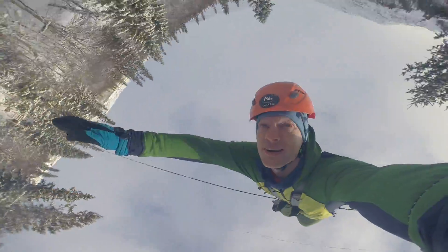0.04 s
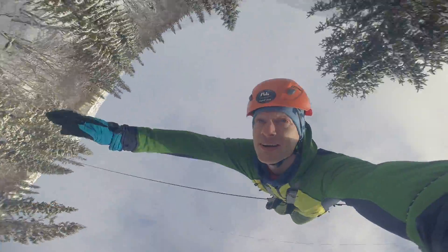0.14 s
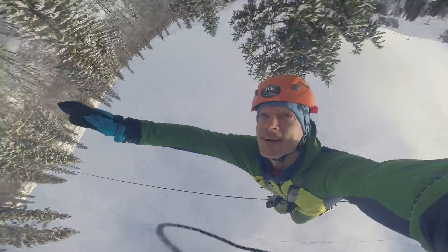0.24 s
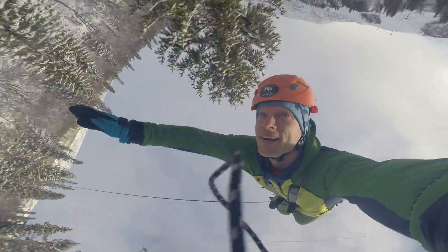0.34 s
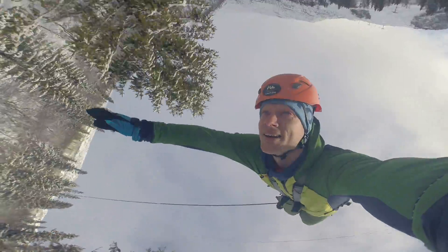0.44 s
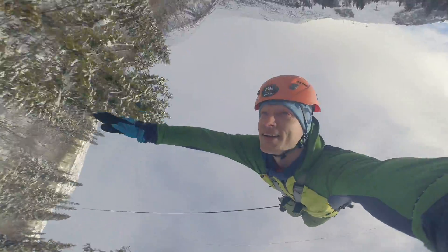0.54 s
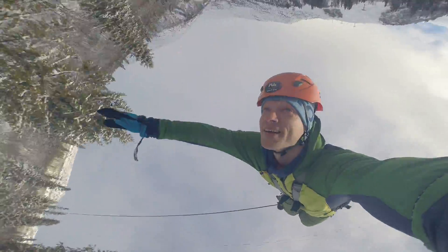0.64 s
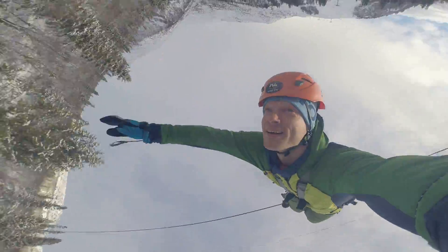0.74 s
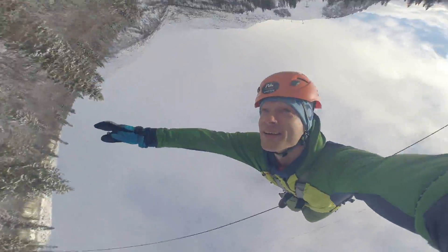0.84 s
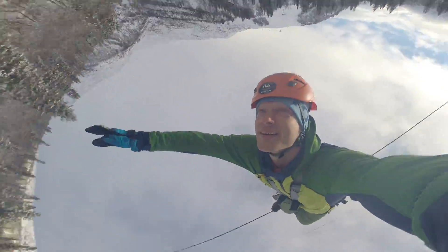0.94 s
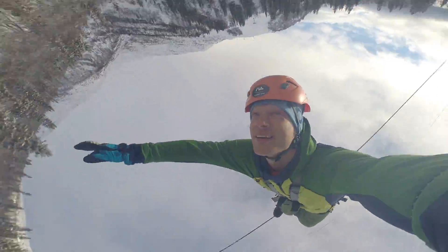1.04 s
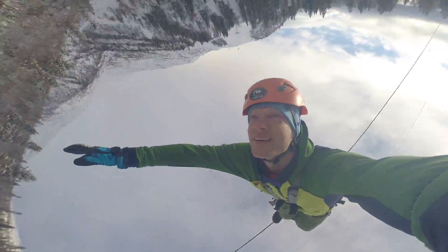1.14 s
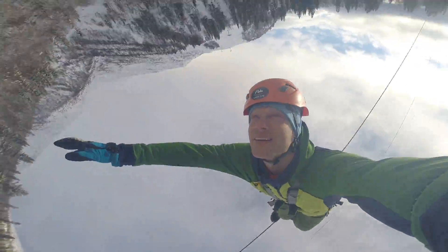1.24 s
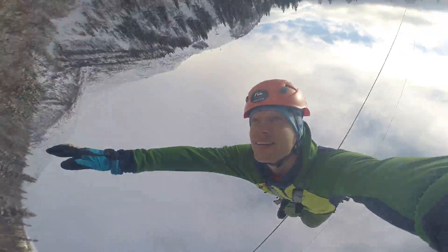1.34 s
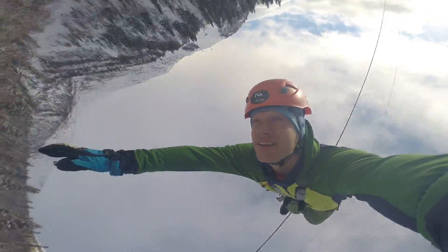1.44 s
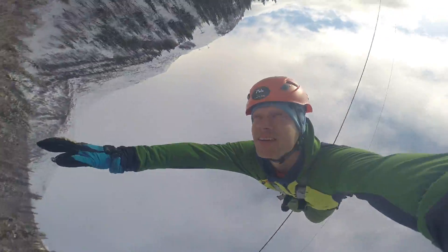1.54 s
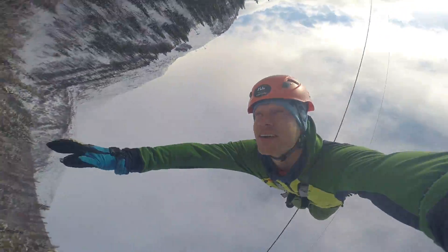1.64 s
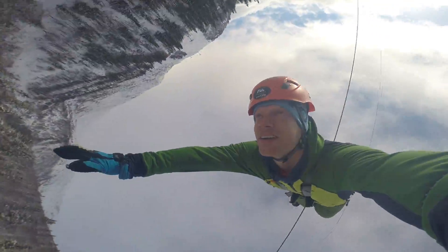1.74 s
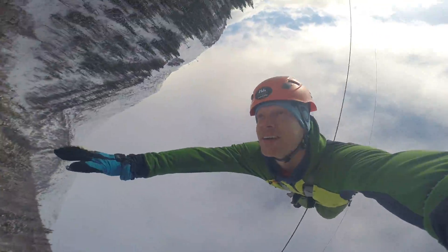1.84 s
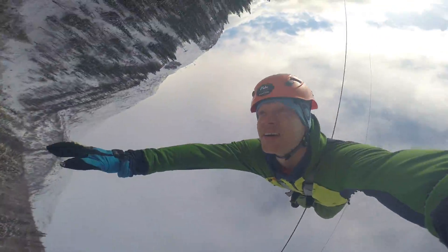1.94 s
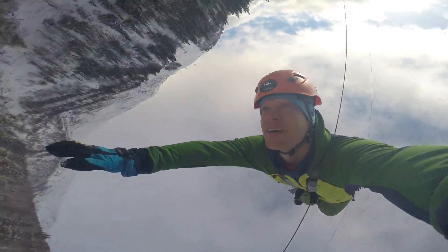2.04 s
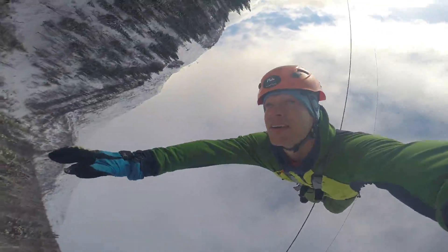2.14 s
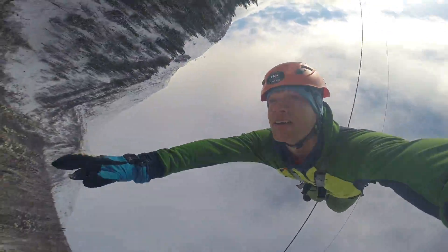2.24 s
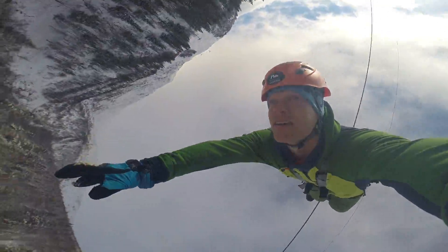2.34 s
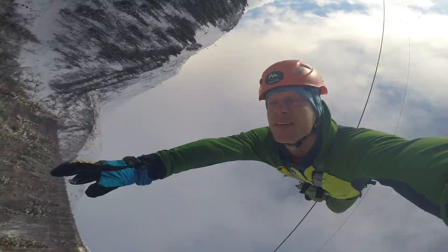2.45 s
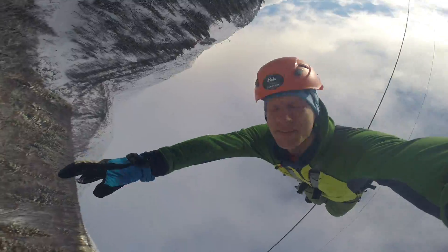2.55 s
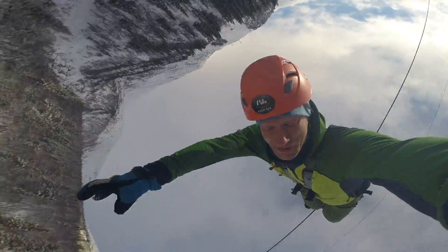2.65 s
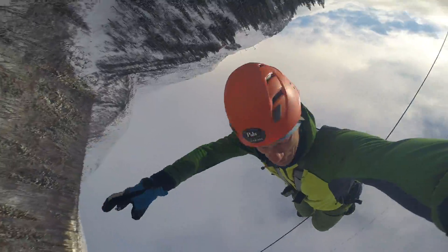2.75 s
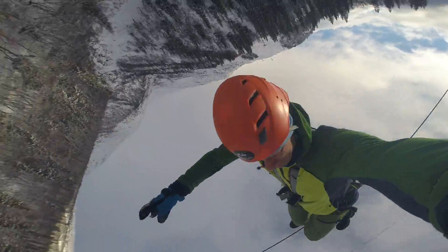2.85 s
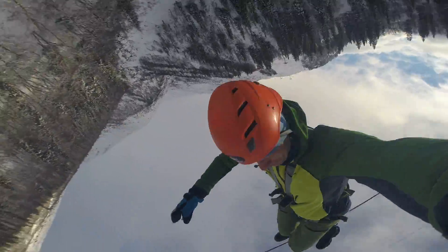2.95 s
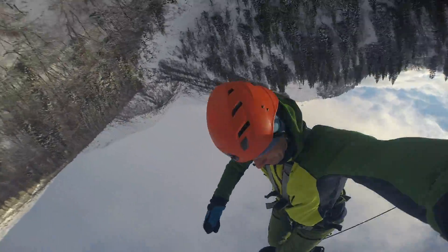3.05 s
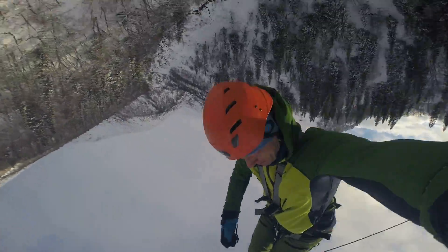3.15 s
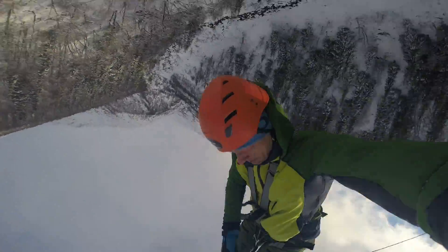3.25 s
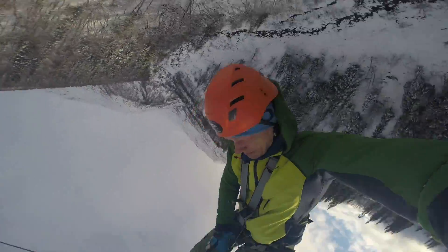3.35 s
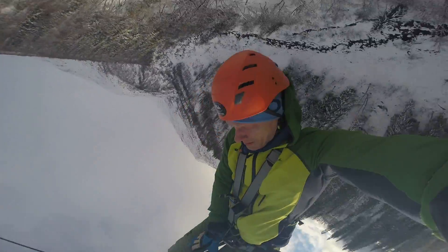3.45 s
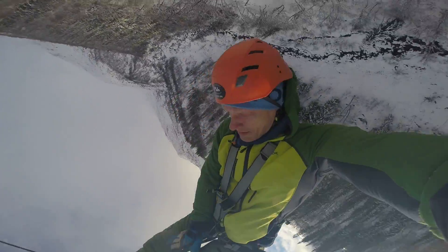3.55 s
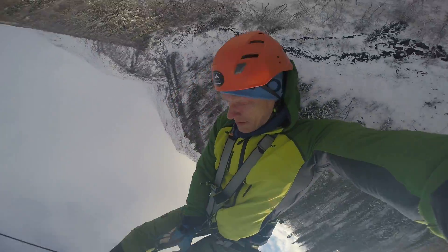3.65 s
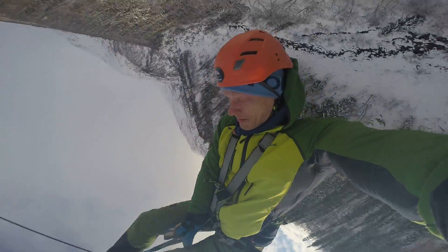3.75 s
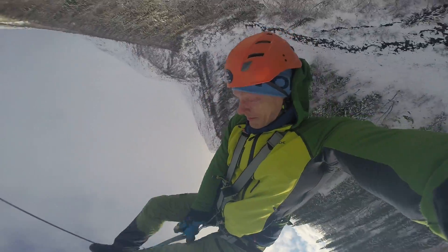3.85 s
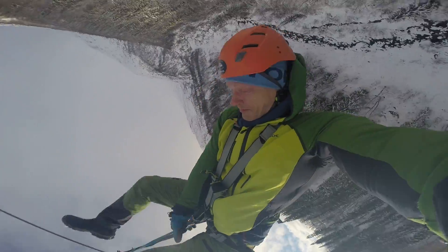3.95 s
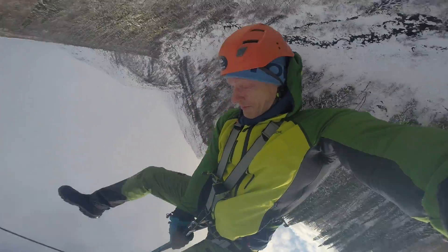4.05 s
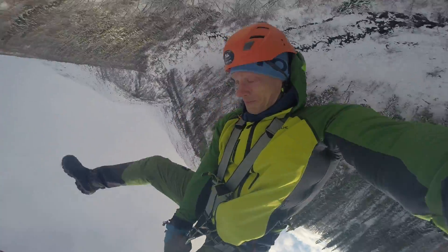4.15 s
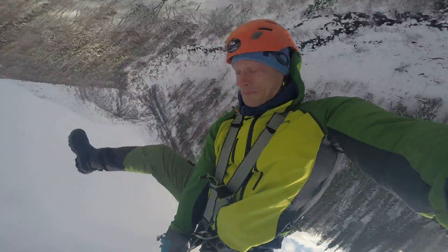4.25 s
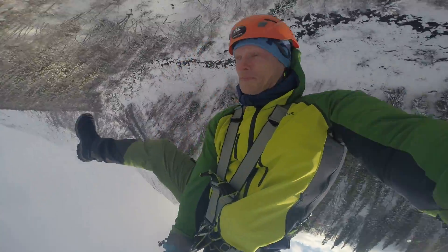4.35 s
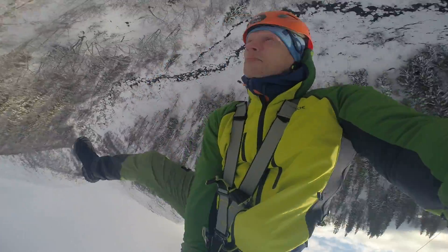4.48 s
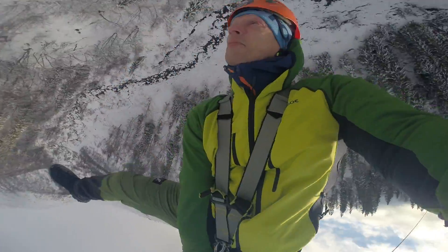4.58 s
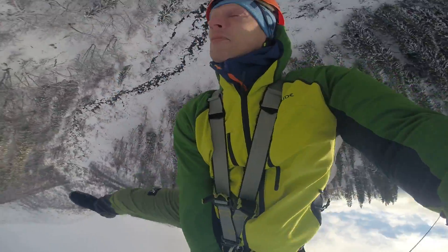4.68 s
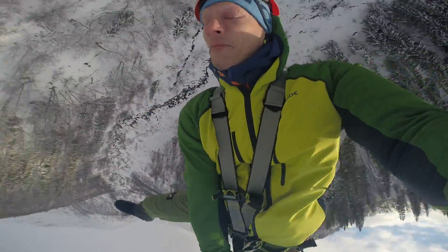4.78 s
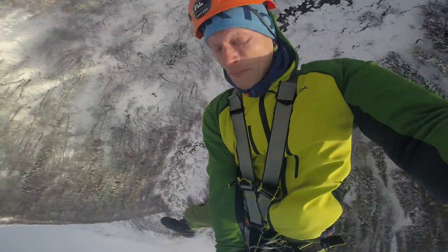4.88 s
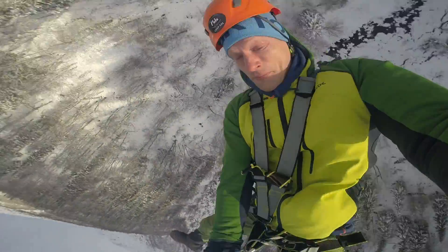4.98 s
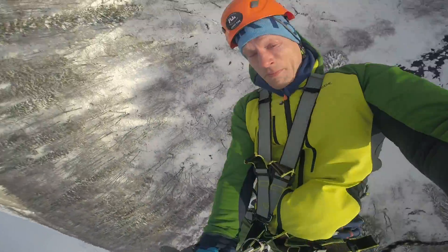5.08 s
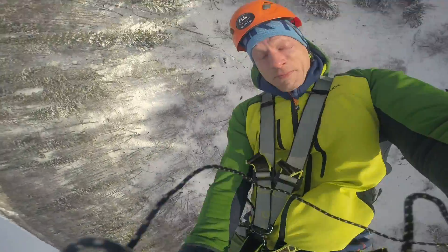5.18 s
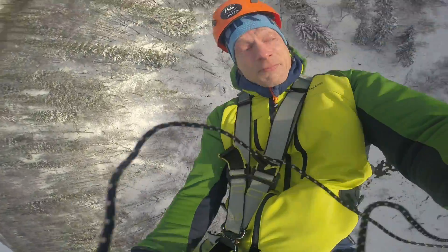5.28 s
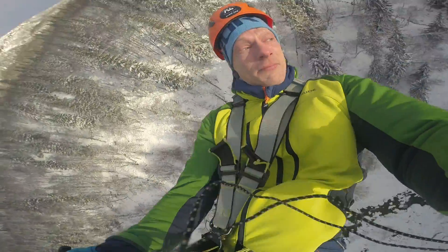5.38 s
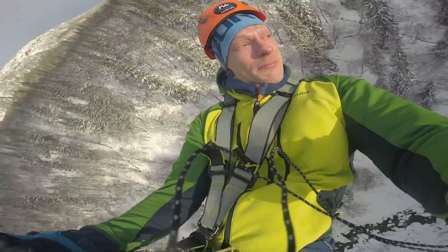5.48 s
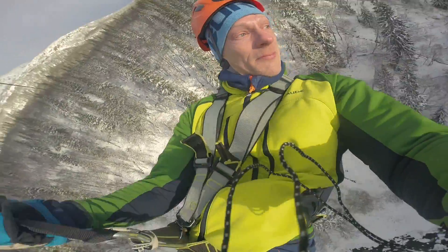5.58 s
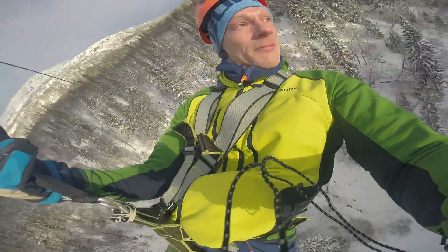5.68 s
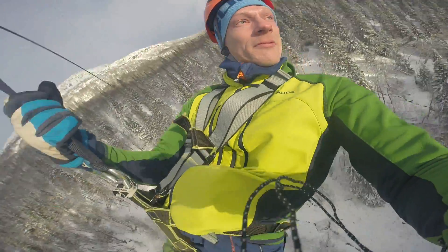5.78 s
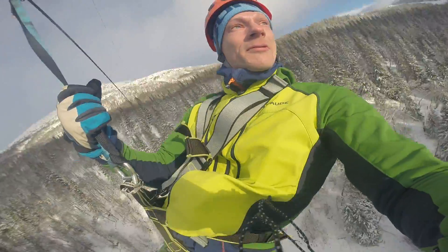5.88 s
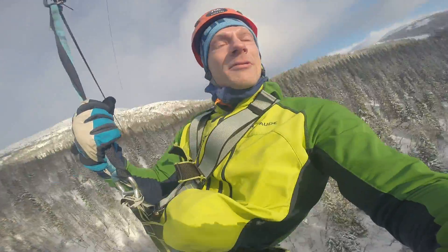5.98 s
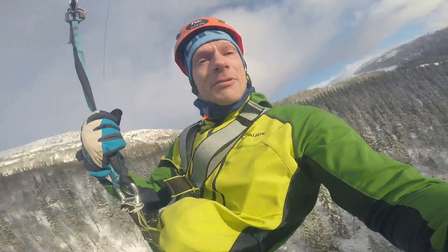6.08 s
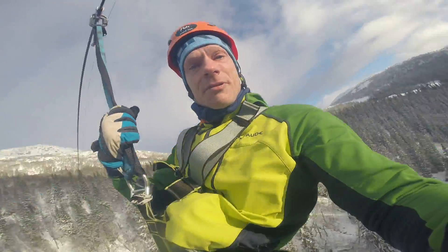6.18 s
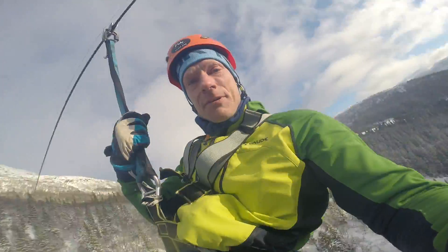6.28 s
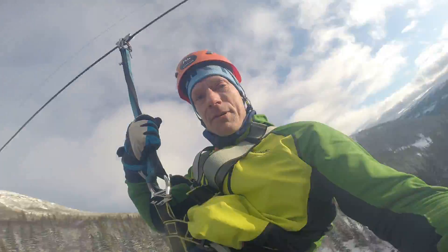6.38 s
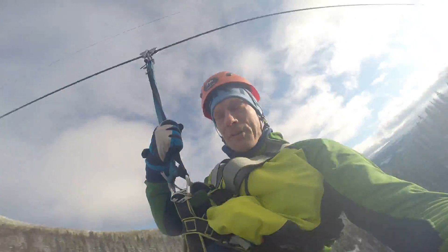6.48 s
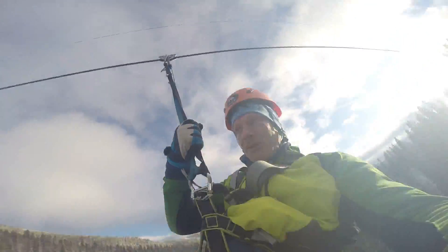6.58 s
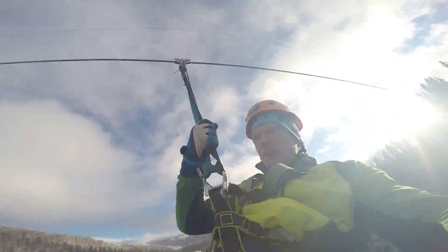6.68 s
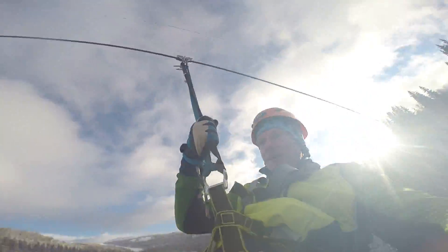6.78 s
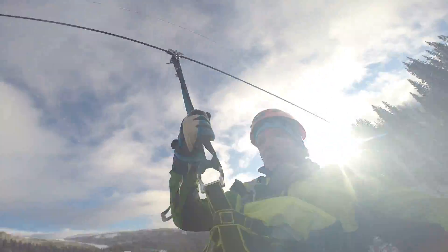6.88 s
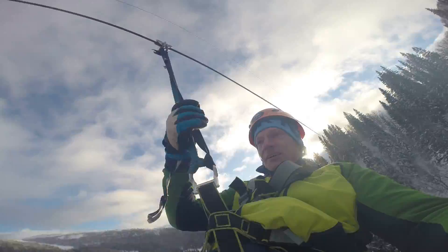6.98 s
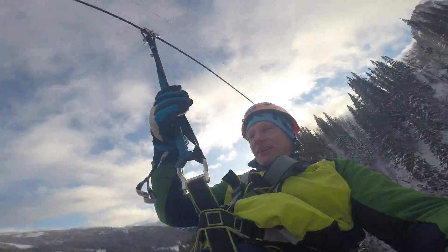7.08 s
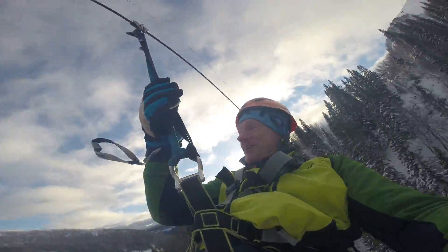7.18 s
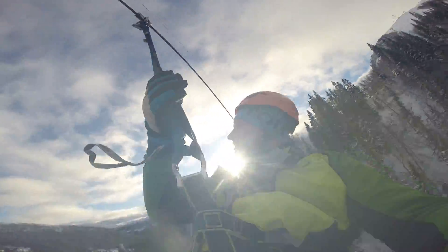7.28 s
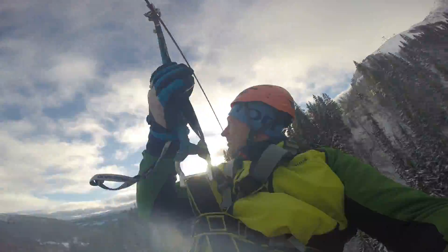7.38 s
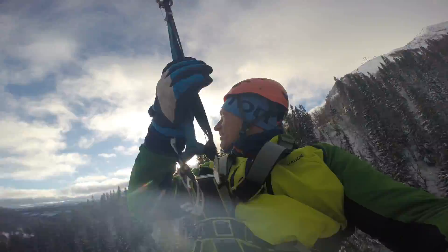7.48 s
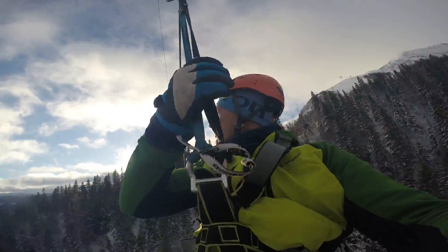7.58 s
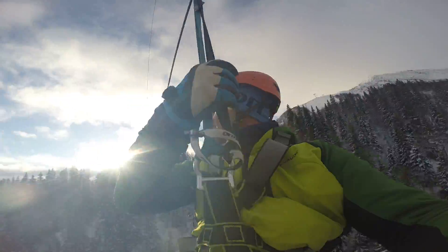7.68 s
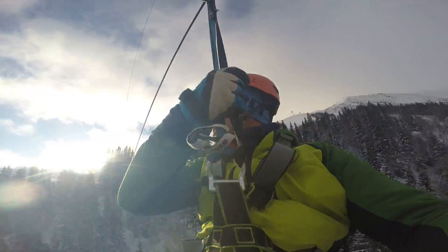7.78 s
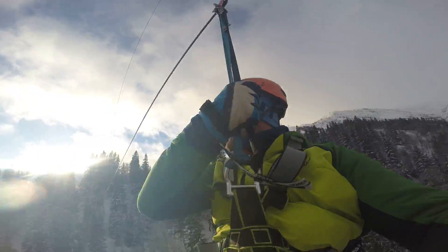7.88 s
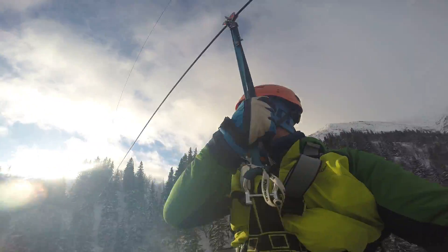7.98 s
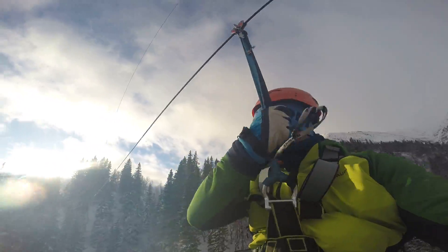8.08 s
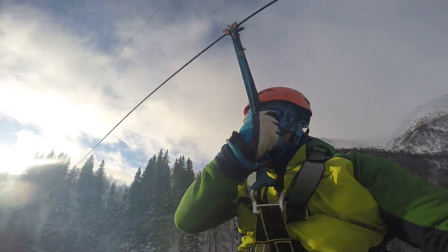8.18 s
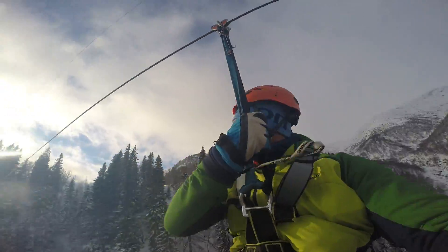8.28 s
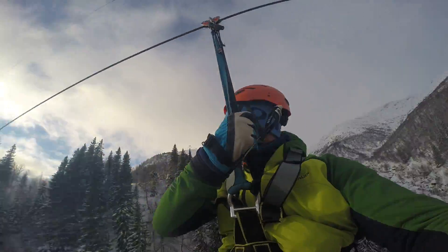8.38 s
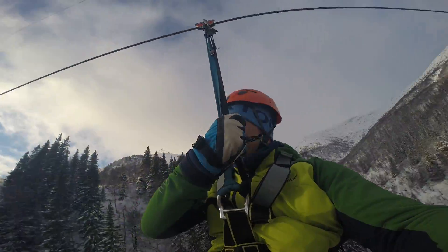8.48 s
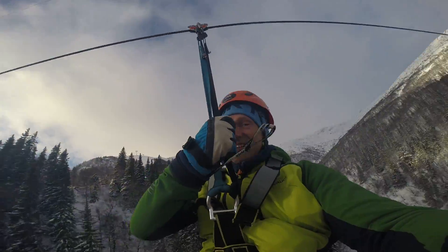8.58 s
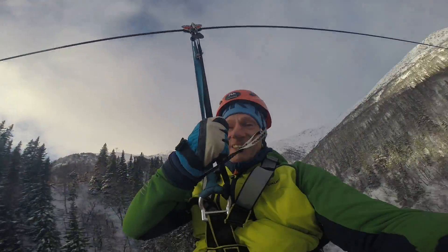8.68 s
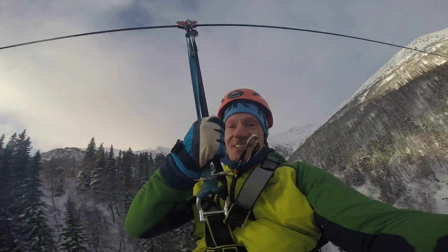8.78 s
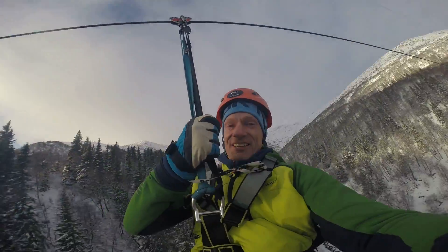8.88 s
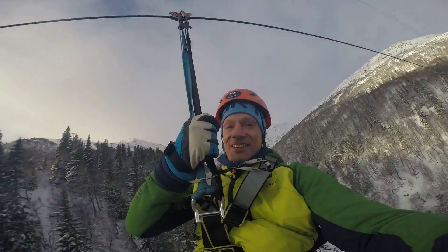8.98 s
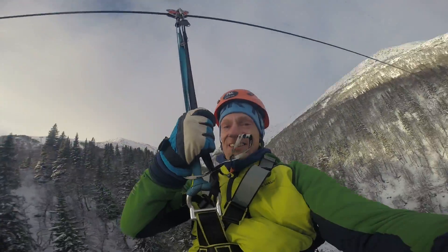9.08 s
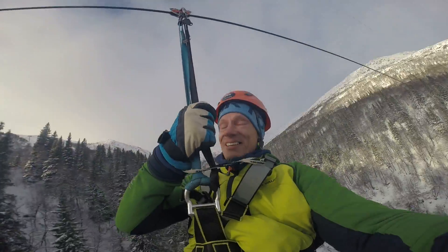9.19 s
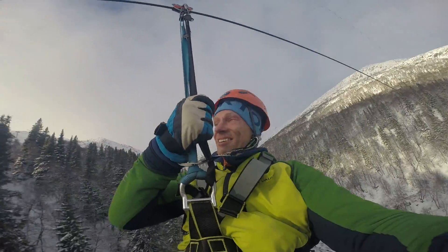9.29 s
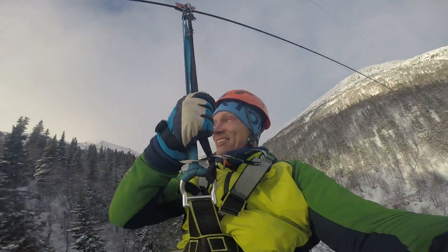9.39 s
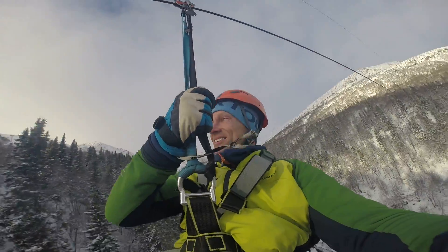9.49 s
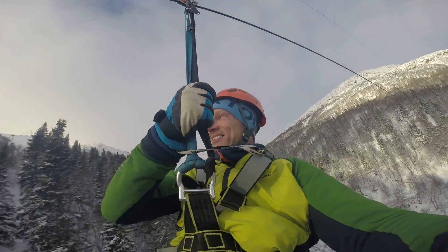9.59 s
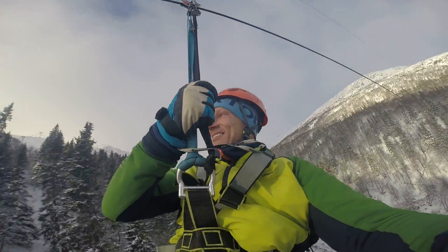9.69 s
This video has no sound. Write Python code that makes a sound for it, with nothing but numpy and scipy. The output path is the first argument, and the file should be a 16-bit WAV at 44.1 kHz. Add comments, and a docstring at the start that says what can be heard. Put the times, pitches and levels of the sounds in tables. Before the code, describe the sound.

Outdoors on a zipline, a handheld camera's microphone catches a faint hiss of wheels on steel wire, airy wind and a few thin bright ticks. After about three seconds a gloved hand rubs and knocks the case in hollow clusters. The trolley then surges close, a harsh bright sizzle with a blurred whine, and stays strong to the end while wind gusts thump and the glove scuffs.

```python
"""A trolley rolls along a steel zip cable above a rider who holds the camera at arm's length.
Rough wire makes its parts ring (many tiny clicks through resonances); the strands passing
under the wheels whine (blurred tones). The glove rubs and knocks on the camera case (clicks
through its resonances), thin ticks (filtered clicks) stand out in the treble, and wind buffets
the microphone (drifting noise bands). One microphone feeds two equal channels."""
import sys
import numpy as np
from scipy import signal
from scipy.fft import next_fast_len
from scipy.io import wavfile
from scipy.ndimage import map_coordinates

SR = 44100
rng = np.random.default_rng(int(sys.argv[2]) if len(sys.argv) > 2 else 0)


def wav_out(sig):
    """Save sig, one row per channel (or a flat mono array), as 16-bit PCM at SR to the path in sys.argv[1]."""
    wavfile.write(sys.argv[1], SR, np.round(np.clip(np.atleast_2d(sig).T, -1, 1) * 32767).astype(np.int16))


N = 429093   # length in samples

# Wind at the microphone: (t/s, deep buffeting level/dB, rumble level/dB)
WIND_LEVELS = [(0, -43, -49), (.35, -47, -53), (1.16, -45, -42), (2.93, -43.5, -45), (3.41, -37, -50),
               (3.85, -38, -44), (4.3, -37, -44), (4.82, -33.5, -44), (5.66, -44.5, -44.5),
               (6.37, -47, -48), (6.96, -46, -48), (7.21, -36.5, -49), (7.5, -35.5, -52),
               (7.66, -43.5, -57), (7.94, -34.5, -47.5), (8.08, -44.5, -49), (9.0, -48.5, -42),
               (9.38, -48, -48), (9.73, -54, -49.5)]
# Tilt of the rumble, only relative: (f/Hz, level per Hz/dB)
RUMBLE_TILT = [(100, -6.5), (200, -2), (330, -6.5), (550, -12.5), (900, -14.5)]
# Air rushing past the case: (t/s, level/dB)
RUSH_LEVEL = [(0, -48.5), (1.2, -40.5), (2.3, -34.5), (3.0, -42), (4.8, -36.5), (5.6, -35), (6.35, -44.5),
              (6.96, -28.5), (7.4, -40.5), (7.75, -39.5), (8.0, -36), (9.4, -34.5), (9.73, -37)]

# Thin bright ticks: (t/s, peak level before filter and boost/dB)
TICK_EVENTS = [(1.3693, -25), (1.5319, -33), (1.6264, -39), (1.7104, -34), (1.8692, -25), (2.2568, -42),
               (2.6913, -38), (2.9407, -31), (3.2714, -33)]

# Resonances of the camera case: (f/Hz, width/Hz, relative level/dB)
CASE_MODES = [(1144, 244, 4.5), (1680, 1400, -4.5), (2520, 840, -5.5), (4300, 180, -3)]
# Knocks on the case: (t/s, level before filters and boost/dB, upper modes re lower, also before/dB)
KNOCK_EVENTS = [(2.942, -11.5, -7), (3.271, -14.5, -9), (3.316, -15.5, -2), (3.404, -19, -15),
                (3.474, -18, -13), (3.616, -29.5, 10), (3.668, -22, -3), (3.721, -18, -10),
                (3.747, -15.5, -18), (3.773, -19, -4), (3.813, -16.5, -6), (4.551, -10.5, -8),
                (4.683, -12.5, -10), (4.707, -15, -7), (4.883, -14.5, -15), (4.906, -19, -6),
                (4.985, -16.5, -11), (6.229, -29, -2), (6.901, -13, -7), (7.061, -15, -7), (7.106, -11, -9),
                (7.438, -20.5, 0), (7.72, -26, -6)]
# Steady rub of the held glove: (t/s, level/dB)
GRIP_LEVEL = [(0, -44.5), (.6, -52.5), (1.2, -38), (4.4, -62), (4.6, -51), (9.73, -52)]
# Strokes of the glove, added to the grip: (peak t/s, peak level/dB, rise/s, fall/s)
GLOVE_STROKES = [(1.08, -38, .3, 0.13), (3.33, -30.5, 0.33, 0.18), (3.74, -30.5, 0.15, 0.15),
                 (4.55, -32.5, 0.36, 0.022), (4.69, -30, 0.062, .03), (4.93, -29.5, .1, 0.1),
                 (6.55, -35.5, 0.042, .3), (6.95, -27, 0.32, 0.33), (7.48, -34, 0.056, 0.06),
                 (7.92, -34.5, 0.025, .5), (8.62, -27.5, 0.51, 0.38), (9.36, -30.5, 0.08, .2),
                 (9.55, -30, 0.23, 0.28)]
# Rise and fall cover this span; a bend above 1 makes the level drop ever faster away from the peak
STROKE_SPAN_DB, STROKE_BEND = 10, 1.31

# Strands under the wheels: (t/s, strand rate f/Hz, first multiple level/dB, second multiple level/dB)
STRAND_WHINE = [(0, 833, -65, -74), (1.3, 919, -58, -52), (2.92, 925, -55, -46.5), (3.3, 936, -51, -66),
                (3.9, 955, -54, -49), (5.06, 947, -62, -61), (5.12, 902, -58, -34), (5.18, 1018, -50, -39),
                (5.3, 973, -55.5, -39), (6.15, 954, -60, -53), (6.4, 928, -71, -67), (7.42, 955, -59, -50),
                (7.52, 934, -50, -40), (7.95, 926.5, -52, -47), (8.3, 918, -56, -47),
                (8.7, 906, -58, -39.5), (9.0, 895, -53, -46), (9.12, 892, -47.5, -42.5),
                (9.73, 871, -44.5, -46)]

# Rolling noise before echoes and dips, in two blocks: before and after the camera swings to face
# the trolley. Rows: (t/s, frame level/dB, wheels level/dB, flanges level/dB, sizzle level/dB)
ROLLING_LEVELS = [
    [(0.0, -46.5, -52.5, -52.5, -64), (0.41, -41.5, -48.5, -47, -56.5), (0.9, -41.5, -52, -53.5, -63),
     (1.28, -41, -45.5, -46.5, -59), (2.38, -35, -45, -47.5, -54.5), (2.72, -42.5, -46.5, -48.5, -56),
     (3.09, -41, -42, -45.5, -58), (3.27, -36.5, -37, -36.5, -47.5), (3.55, -38.5, -39, -45.5, -50.5),
     (4.26, -38, -28, -30.5, -40.5), (4.62, -30.5, -39.5, -30, -44), (4.8, -35.5, -39.5, -41, -52),
     (5.06, -31, -34.5, -32.5, -50)],
    [(5.09, -26.5, -31, -26, -41.5), (5.3, -21, -21, -26.5, -27.5), (5.4, -22.5, -17.5, -26.5, -36.5),
     (5.59, -23, -16.5, -25, -35.5), (5.88, -34, -24, -22.5, -35.5), (5.95, -37, -23, -21.5, -31.5),
     (6.41, -33, -26, -30, -34), (6.63, -26, -22, -27, -28.5), (7.16, -28.5, -25.5, -31, -31.5),
     (7.61, -30, -25, -23.5, -36.5), (8.79, -26.5, -22.5, -30, -34), (9.72, -24.5, -23.5, -27, -36.5),
     (9.73, -36, -21.5, -31, -36.5)],
]
# Slower shifts of balance: (t/s, axles level re mean of frame and wheels/dB,
# bearings level re sizzle/dB, third strand multiple level re frame/dB)
PART_BALANCE = [(0, -4, -9, -14), (3.3, -7.5, -12, -5), (3.95, -6, -12, 0), (4.3, -5, -8, -11),
                (4.6, -4.5, -10, -3), (5.12, -3, -13, -6), (5.6, -13, -11, -20), (5.95, -2.5, -9, -7),
                (6.3, -10, -10, -3), (7.3, -2.5, -14, -3.5), (7.6, -1.5, -1, -9), (8.2, -0.5, -4.5, -11),
                (8.7, 0.5, -6, -5), (9.73, -2, -1.5, -4)]
# Pitch slides as the trolley turns against the microphone; only the distance from each
# column's mean counts: (t/s, frame f/Hz, wheels f/Hz, flanges f/Hz)
TURNING_PITCH = [(0.0, 2714, 4874, 6337), (2.38, 2653, 4958, 6423), (2.85, 2744, 4696, 6290),
                 (3.4, 2795, 4920, 6540), (3.79, 2889, 4870, 6250), (4.18, 2900, 4950, 6355),
                 (4.36, 2681, 5052, 6390), (4.55, 2869, 5184, 6456), (5.15, 2857, 4645, 6376),
                 (5.83, 2736, 4918, 6176), (6.07, 3000, 5230, 6010), (6.8, 2939, 4840, 6420),
                 (7.37, 2836, 5108, 6150), (7.95, 2897, 4997, 5806), (8.15, 2942, 4928, 6476),
                 (8.67, 2811, 4810, 6470), (9.73, 2707, 4953, 6420)]
# Resonances of each trolley part: (f/Hz, width/Hz, relative level/dB)
FRAME_MODES = [(2585, 450, -0.5), (2850, 384, 3.5), (3264, 400, -3)]
AXLE_MODES = [(3490, 780, -4), (3820, 1340, -0.1)]
WHEEL_MODES = [(4560, 760, -2.7), (5297, 590, 1)]
FLANGE_MODES = [(5500, 810, 0.3), (6530, 470, -1), (7450, 630, -4.5)]
SIZZLE_MODES = [(8760, 950, 3.4), (10990, 300, 0.5)]
BEARING_MODES = [(12010, 520, -4), (13270, 400, -15), (14400, 590, -11.5)]
# Echoes off the near hand and, upside down, off the rider's jacket:
# (t/s, hand delay/ms, jacket share/0-1)
ECHOES = [(0, 0.37, 0), (2.9, 0.38, 0), (3.4, 0.38, 0), (4.2, 0.33, 0.2), (4.5, 0.287, .03),
          (5.13, 0.36, 0), (5.33, 0.24, 0.18), (5.95, 0.17, 0), (6.2, 0.23, 0.2), (6.45, 0.39, 0.13),
          (6.7, 0.334, 0.2), (7.3, 0.4, .4), (7.6, 0.37, 0.08), (7.8, 0.25, 0.14), (8.7, 0.25, 0.09),
          (9.73, 0.28, 0.25)]
HAND_SHARE, JACKET_DELAY_MS = 0.11, 0.497
# Narrow dips gliding through the hiss as the camera turns: (t/s, lower f/Hz, middle f/Hz, upper f/Hz)
DIP_CENTRES = [(0, 4000, 6040, 8200), (3.0, 3680, 6100, 8000), (3.5, 3900, 5670, 7600),
               (4.3, 4000, 5670, 7950), (4.6, 4100, 5300, 8400), (5.0, 4060, 5470, 8000),
               (5.3, 3930, 5700, 8400), (5.75, 3600, 6200, 8100), (5.95, 3205, 6500, 7890),
               (6.1, 3900, 6700, 7700), (6.4, 4130, 6804, 7800), (6.9, 3900, 6300, 8000),
               (7.5, 4100, 6000, 7900), (8.1, 4080, 5860, 8800), (8.8, 4000, 5800, 8204),
               (9.73, 4000, 5900, 8050)]
# A longer averaging window makes each dip narrower; the share is what it takes away at its centre
DIP_WINDOW_SAMPLES, DIP_SHARE = 189, 0.36


def from_db(db):
    """Turn decibels into a gain."""
    return 10 ** (np.asarray(db) / 20)


def rms_one(x):
    """Scale to an rms (average strength) of 1."""
    return x / np.sqrt(np.mean(x ** 2) + 1e-20)


def in_time(rows):
    """Draw straight lines between table rows: each column gets one value a sample."""
    t, *columns = np.transpose(rows)
    return [np.interp(np.arange(N) / SR, t, column) for column in columns]


def drift(corner_hz):
    """Slow random wandering: noise through two equal one-pole low-passes, rms 1."""
    r = np.exp(-2 * np.pi * corner_hz / SR)
    noise = rng.standard_normal(N + SR)
    settled = signal.lfilter([1], [1, -2 * r, r * r], noise)[SR:]
    return rms_one(settled)


def resonate(x, modes):
    """Ring several resonances side by side, every second one upside down."""
    out = 0
    for k, (hz, width_hz, level_db) in enumerate(modes):
        r = np.exp(-np.pi * width_hz / SR)   # a wider resonance dies away sooner
        top = [(1 - r * r) / 2, 0, (r * r - 1) / 2]
        bottom = [1, -2 * r * np.cos(2 * np.pi * hz / SR), r * r]
        out = out + (-1) ** k * from_db(level_db) * signal.lfilter(top, bottom, x)
    return out


def band(x, low_hz, high_hz, order=2):
    """Keep only the sound between two frequencies (Butterworth band-pass)."""
    return signal.sosfilt(signal.butter(order, [low_hz, high_hz], "band", fs=SR, output="sos"), x)


def grit(per_s, spread_db, clump_db, clump_rate):
    """Tiny contacts at random moments, of uneven size, swelling in clumps."""
    sizes = from_db(spread_db * np.minimum(rng.exponential(1, N), 5))
    signs = rng.choice([-1, 1], N)
    touching = rng.random(N) < per_s / SR
    clumps = from_db(clump_db * drift(clump_rate))
    return sizes * signs * touching * clumps + 1e-18


def impulses(events):
    """One single-sample click for each row (time, level)."""
    t, peak_db = np.transpose(events)
    out = np.full(N, 1e-18)
    out[np.round(t * SR).astype(int)] = from_db(peak_db)
    return out


def deep_buffeting(gust):
    """Lumps of very low noise, swelling partly with the shared gusts."""
    lumps = band(rng.standard_normal(N + SR), 11.4, 109)[SR:]
    return rms_one(lumps * from_db(0.53 * gust + 2.1 * drift(9.3)))


def wind_rumble(gust):
    """Half-octave noise bands that gust partly together, partly alone."""
    edges_hz = 90 * 2 ** np.arange(0, 3.6, .5)
    hz, level_db = np.transpose(RUMBLE_TILT)
    out = 0
    for low, high in zip(edges_hz, edges_hz[1:]):
        tilt_db = np.interp(np.log(low * high) / 2, np.log(hz), level_db)
        gain_db = tilt_db + 1.7 * gust + 2.3 * drift(6.2)
        out = out + from_db(gain_db) * band(rng.standard_normal(N), low, high)
    return rms_one(out)


def air_rush():
    """Smoother noise of air passing the case, flickering in level."""
    return rms_one(band(rng.standard_normal(N), 1490, 2750) * from_db(1.9 * drift(12)))


def wind():
    """Moving air makes deep lumps, a rumble and a rush at the microphone."""
    deep_db, rumble_db = in_time(WIND_LEVELS)
    rush_db, = in_time(RUSH_LEVEL)
    gust = drift(5.3)
    out = from_db(deep_db) * deep_buffeting(gust)
    out = out + from_db(rumble_db) * wind_rumble(gust)
    return out + from_db(rush_db) * air_rush()


def ticks():
    """Very short broad clicks, mostly treble."""
    return from_db(11.5) * band(impulses(TICK_EVENTS), 4000, 14000, order=1)


def pressure():
    """Gain of the rubbing: the steady grip plus strokes that swell and fade, added as power."""
    t = np.arange(N) / SR
    power = from_db(2 * in_time(GRIP_LEVEL)[0])
    for peak_t, peak_db, rise_s, fall_s in GLOVE_STROKES:
        away = np.maximum((peak_t - t) / rise_s, (t - peak_t) / fall_s)
        drop_db = STROKE_SPAN_DB * np.minimum(away, 10) ** STROKE_BEND
        power = power + from_db(2 * (peak_db - drop_db))
    return np.sqrt(power)


def glove_rub():
    """Fabric sticks and slips in tiny jerks, heard through the resonances of the case."""
    slips = grit(3000, spread_db=2.5, clump_db=1.5, clump_rate=28)
    return pressure() * rms_one(band(resonate(slips, CASE_MODES), 543, 2720))


def glove_knocks():
    """Knocks of a few milliseconds ring the case and nudge the whole camera."""
    t, low_db, upper_db = np.transpose(KNOCK_EVENTS)
    judder = np.zeros(200)
    judder[[0, 38, 75, 170]] = 1, 0.39, 0.12, 0.083   # the contact judders before it settles

    def hits(level_db):
        """Place a juddering contact at every knock."""
        return np.convolve(impulses(np.transpose([t, level_db])), judder)[:N]

    low, high = hits(low_db), hits(low_db + upper_db)
    lower_ring = from_db(25.5) * band(resonate(low, CASE_MODES[:2]), 710, 1800)
    upper_ring = from_db(32.5) * band(resonate(high, CASE_MODES[2:]), 1500, 7000)
    thump = from_db(21.0) * band(low, 56, 250)   # the camera being nudged
    return lower_ring + upper_ring + thump


def whine():
    """Strands pass at a steady rate, giving tones at its multiples; uneven wires blur them."""
    rate_hz, first_db, second_db = in_time(STRAND_WHINE)
    frame_db = in_time(np.vstack(ROLLING_LEVELS))[0]
    third_db = frame_db + in_time(PART_BALANCE)[2]   # the frame rings along
    phase = 2 * np.pi * np.cumsum(rate_hz * (1 + 0.001304 * drift(13.8))) / SR
    out = 0
    # each multiple: level, strength of the blur, speed of the blur in Hz
    multiples = [(first_db, .3, 12), (second_db, .3, 15), (third_db, .9, 30)]
    for k, (level_db, blur, blur_hz) in enumerate(multiples, start=1):
        wobble = 1 + blur * (drift(blur_hz) + 1j * drift(blur_hz))   # level and phase wander
        tone = np.real(wobble * np.exp(1j * k * phase))
        out = out + from_db(level_db) * rms_one(tone)
    return out


def slide(x, centre_hz):
    """Shift a band up and down by the distance of its pitch from the mean pitch."""
    turn = 2 * np.pi * np.cumsum(centre_hz - np.mean(centre_hz)) / SR
    return np.real(signal.hilbert(x, next_fast_len(N))[:N] * np.exp(1j * turn))


def reflected(x):
    """Two close echoes, one after the other; their short delays cut dips into the hiss."""
    hand_ms, jacket = in_time(ECHOES)
    for delay_ms, share in [(hand_ms, HAND_SHARE), (JACKET_DELAY_MS, -np.clip(jacket, 0, 1))]:
        late = map_coordinates(x, [np.arange(N) - delay_ms * SR / 1000], order=3)
        x = (x + share * late) / np.sqrt(1 + share ** 2)
    return x


def dipped(x):
    """Each dip takes away a share of a narrow band about its moving centre."""
    window = np.hanning(DIP_WINDOW_SAMPLES)
    for centre_hz in in_time(DIP_CENTRES):
        turn = np.exp(2j * np.pi * np.cumsum(centre_hz) / SR)
        # move the centre down to 0 Hz, smooth, then move it back up
        low = signal.fftconvolve(x / turn, window / window.sum(), "same")
        x = x - 2 * DIP_SHARE * np.real(low * turn)
    return x


def rolling():
    """Rough wire excites every trolley part; they share some of the contacts and clumping."""
    frame_db, wheels_db, flanges_db, sizzle_db = in_time(np.vstack(ROLLING_LEVELS))
    axles_db, bearings_db, _ = in_time(PART_BALANCE)
    frame_hz, wheels_hz, flanges_hz = in_time(TURNING_PITCH)
    shared = rms_one(grit(6000, spread_db=3.5, clump_db=2.0, clump_rate=40))

    def part(modes, low_hz, high_hz):
        """One part rings to the shared contacts and to its own."""
        own = rms_one(grit(9000, spread_db=1.5, clump_db=1.56, clump_rate=16))
        return rms_one(band(resonate(0.61 * shared + own, modes), low_hz, high_hz))

    frame = slide(part(FRAME_MODES, 2080, 3450), frame_hz)
    axles = part(AXLE_MODES, 2820, 4270)
    wheels = slide(part(WHEEL_MODES, 3900, 5200), wheels_hz)
    flanges = slide(part(FLANGE_MODES, 5890, 8230), flanges_hz)
    sizzle = part(SIZZLE_MODES, 5100, 12600)
    bearings = part(BEARING_MODES, 10000, 14300)

    out = from_db(frame_db) * frame
    out = out + from_db((frame_db + wheels_db) / 2 + axles_db) * axles
    out = out + from_db(wheels_db) * wheels
    out = out + from_db(flanges_db) * flanges
    return out + from_db(sizzle_db) * (sizzle + from_db(bearings_db) * bearings)


def scene():
    """All sources meet at one microphone; only the rolling gets echoes and dips."""
    background = wind() + ticks()
    handling = glove_rub() + glove_knocks()
    trolley = whine() + dipped(reflected(rolling()))
    return np.tile(background + handling + trolley, (2, 1))


def record(dry):
    """Cut the top treble steeply above 15300 Hz."""
    return signal.sosfilt(signal.ellip(12, .5, 80, 15300, fs=SR, output="sos"), dry)


dry = scene()
out = record(dry)
wav_out(out)
```